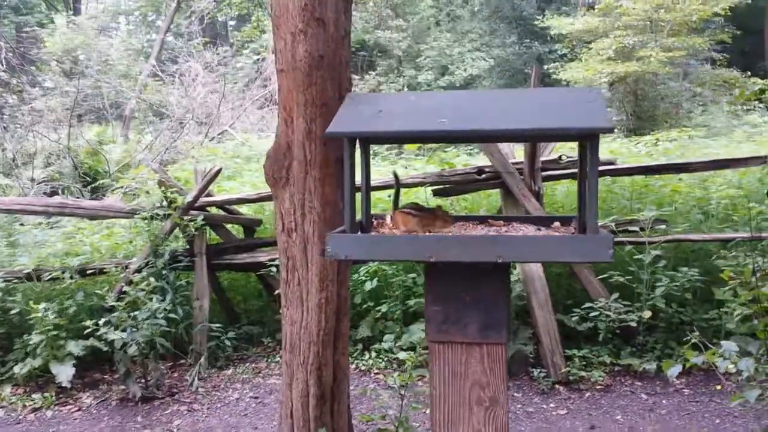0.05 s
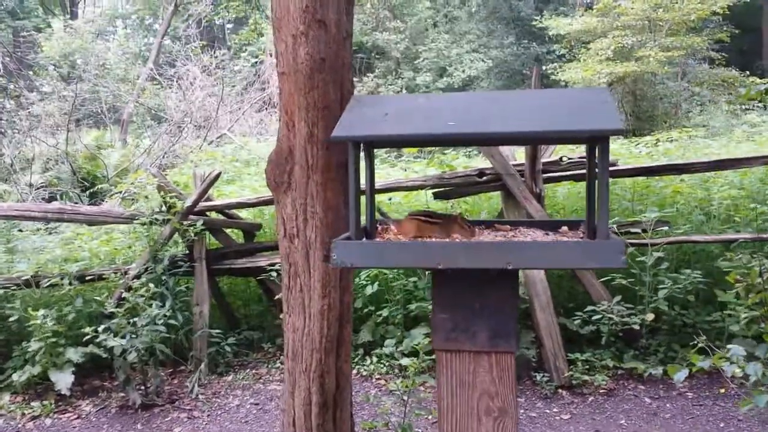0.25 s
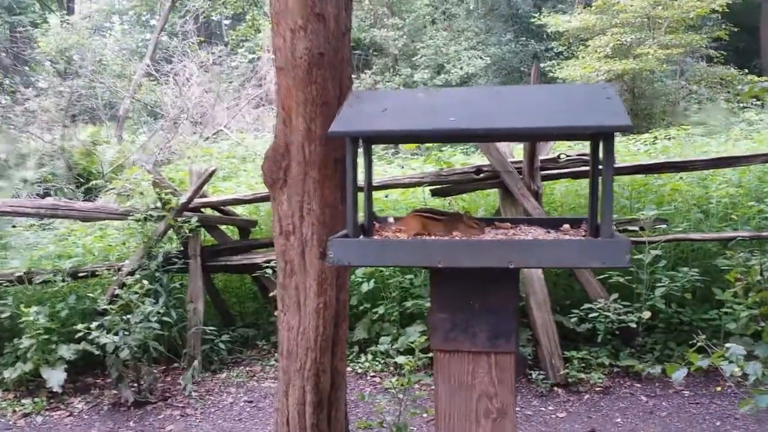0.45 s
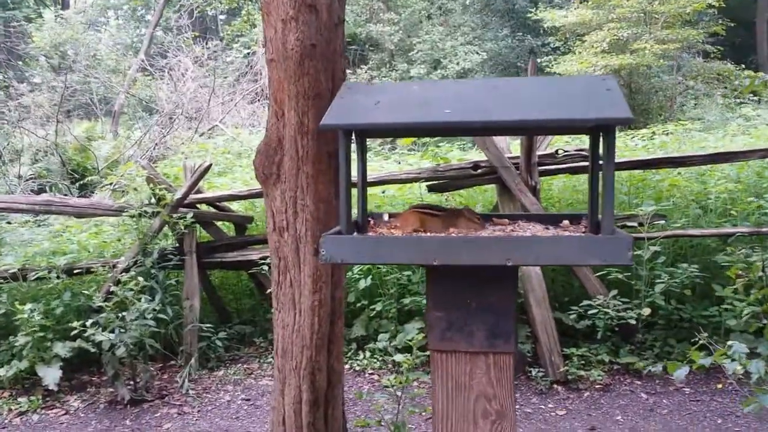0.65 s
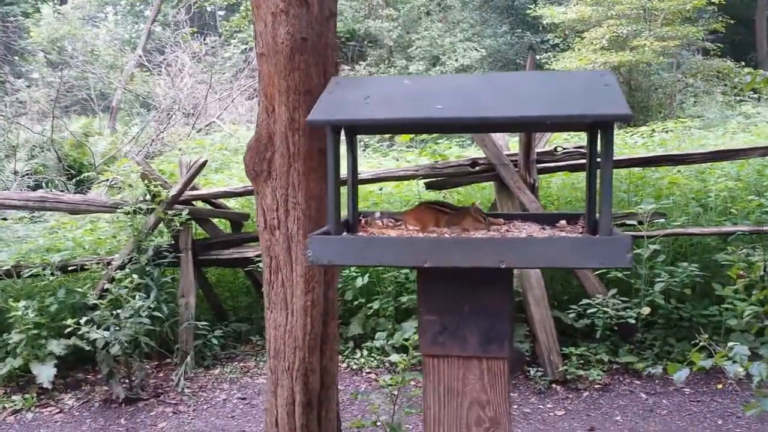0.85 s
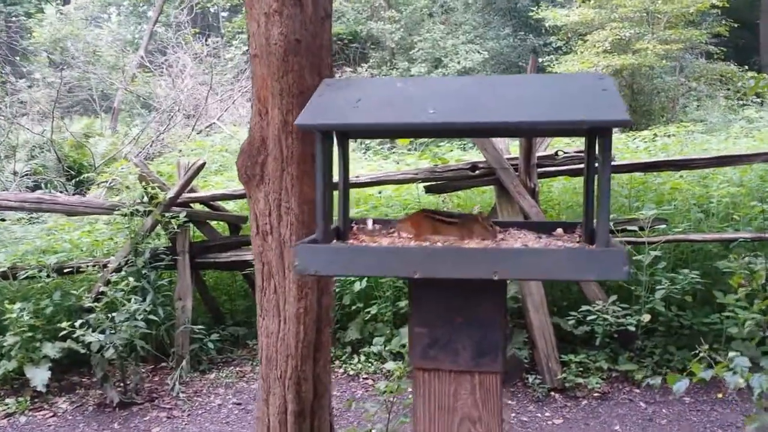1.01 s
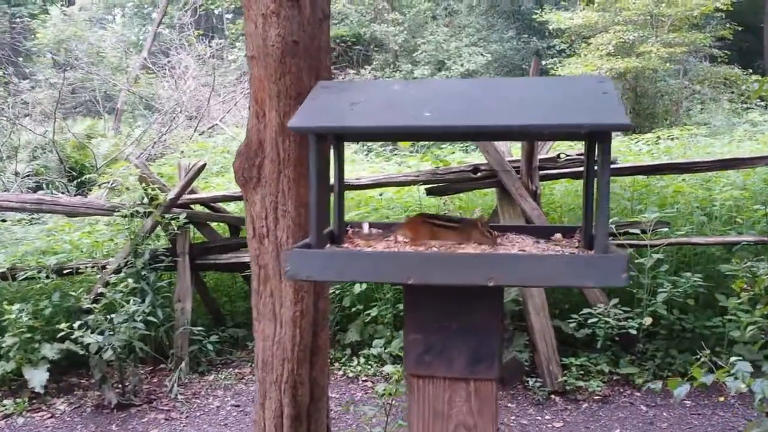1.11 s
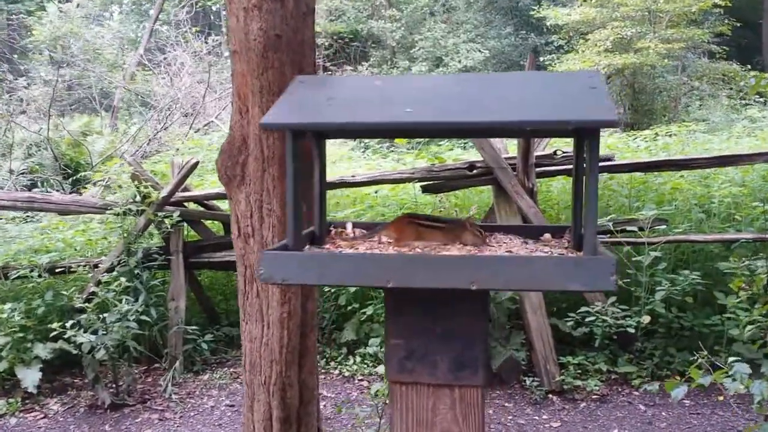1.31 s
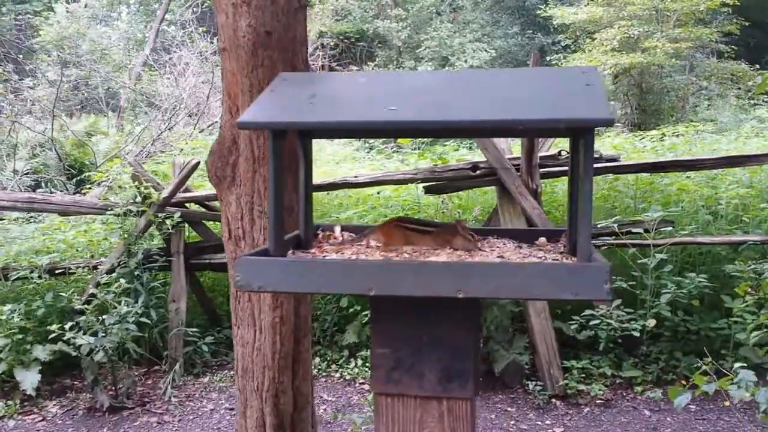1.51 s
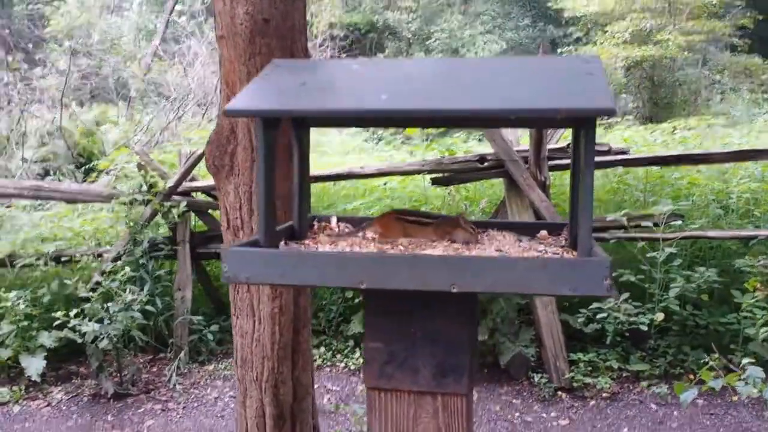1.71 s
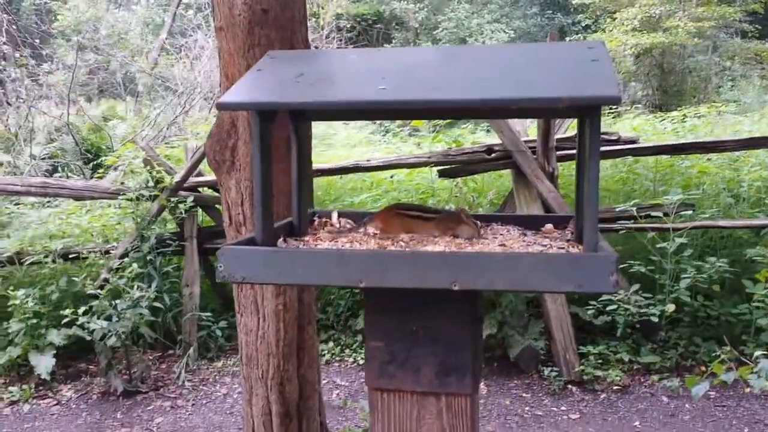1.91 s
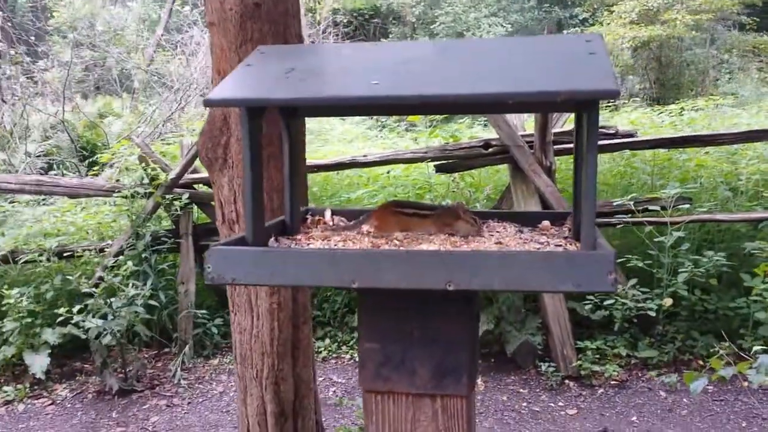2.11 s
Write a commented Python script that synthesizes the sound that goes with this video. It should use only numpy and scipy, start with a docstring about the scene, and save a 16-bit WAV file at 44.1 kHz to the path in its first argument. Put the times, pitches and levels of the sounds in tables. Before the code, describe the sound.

One short, high chipmunk chirp echoes briefly against quiet open air.

```python
"""Open air hisses over a low distant rumble and a faint machine hum, in a yard at the edge of a wood.
Far birds warble through the trees, and seeds tick and rustle faintly in a feeder.
Off to the right a chipmunk gives one sharp chip, a whistle that sweeps up in 20 ms;
nearby surfaces and then the trees throw it back. Later a light tap rings the feeder's wooden tray."""
import sys
import numpy as np
from scipy import signal
from scipy.fft import rfft, irfft, next_fast_len
from scipy.io import wavfile
from scipy.ndimage import uniform_filter1d

SR = 44100
rng = np.random.default_rng(int(sys.argv[2]) if len(sys.argv) > 2 else 0)


def store_pcm(level_fs):
    """Save levels as 16-bit WAV."""
    pcm = np.round(np.clip(level_fs, -1, 1) * 32767).astype(np.int16)
    wavfile.write(sys.argv[1], SR, np.atleast_2d(pcm).T)


N = 94815
NEAR_T60_S = .4  # reverb time of the yard

def amp(db):
    """Decibels to gain."""
    return 10 ** (np.asarray(db) / 20)

def unit(x):
    """Scales to rms 1."""
    return x / np.sqrt(np.mean(x ** 2) + 1e-20)

def curves_at(table, hz):
    """A table's curves at the given frequencies, interpolated on a log axis."""
    f, *columns = np.transpose(table)
    return np.array([np.interp(np.log(hz + 1), np.log(f + 1), c) for c in columns])

def pan(db):
    """Stereo gains for a level difference; positive leans left."""
    return amp(np.array([[.5], [-.5]]) * db)

def add(mix, start_s, sound):
    """Mixes a sound in at a cue time, trimming any overhang."""
    at = round(start_s * SR)
    sound = sound[..., max(-at, 0):]
    part = mix[..., max(at, 0):][..., :sound.shape[-1]]
    part += sound[..., :part.shape[-1]]

def eq(x, gain):
    """Filters by a gain that is a function of frequency."""
    size = next_fast_len(2 * x.shape[-1])
    spectrum = rfft(x, size) * gain(np.fft.rfftfreq(size, 1 / SR))
    return irfft(spectrum, size)[..., :x.shape[-1]]

def wander(count, hz):
    """Smooth random modulation up to about the given rate."""
    return unit(eq(rng.standard_normal(count), lambda f: np.exp(-(f / hz) ** 2)))

def scatter(x, t60, build_s=.0037, taps_per_s=3000):
    """Reverb: many small reflections off trunks and leaves, different left and right."""
    t = np.arange(SR) / SR
    taps = rng.standard_normal((2, SR)) * (rng.random((2, SR)) < taps_per_s / SR)
    taps *= (1 - np.exp(-t / build_s)) * np.exp(-np.log(1000) * t / t60)
    taps /= np.linalg.norm(taps, axis=1, keepdims=True)
    return signal.fftconvolve(x[None], taps, axes=1)[:, :N]

# Tone of the air bed: f/Hz, relative level/dB
AIR_SPECTRUM = [(15, -49), (25, -14), (37, -9), (100, 0.5), (170, -11.5), (247, -17), (358, -20.5),
                (520, -26), (716, -18.5), (840, -16), (985, -19), (1550, -26), (1920, -25.5), (2080, -28),
                (3930, -33), (5270, -29.5), (14500, -39)]
# Its stereo image: f/Hz, coherence, left minus right/dB
AIR_IMAGE = [(60, .98, 2), (133, 1, 1.5), (290, 0.76, 2), (700, 1, 2.5), (1280, 0, 5), (4300, 0.43, 3.5),
             (8400, 0, -2.5), (13500, 0, 1)]
# Its fader rides: t/s, rumble gain/dB, hiss gain/dB
AIR_RIDES = [(0, -1, 6), (.07, 8, 5.5), (.14, -2.5, 3), (.22, 6, 5.5), (.31, 1.5, 5.5), (.52, 3, 3.5),
             (.62, 0, 2.5), (.78, -1.5, 2.5), (.88, 2, 2), (1.02, 0, 1), (1.13, 2, 2.5), (1.28, -5, -1),
             (1.52, -1, -0.5), (1.63, 0, 1.5), (1.82, 2, 3.5), (1.92, -0.5, 2.5), (2.15, 2, 2)]

def air(bed_db=-53.5, flicker_db=1.16, lag_s=.000323, crossover_hz=470):
    """Distant rumble and leaf hiss, each drifting slowly in level."""
    frames, hz = N // 512 + 5, np.fft.rfftfreq(2048, 1 / SR)
    re, im, side_re, side_im, flicker = rng.standard_normal((frames, len(hz), 5)).T
    coherence, balance_db = curves_at(AIR_IMAGE, hz)
    coherence = coherence[:, None]
    left = re + 1j * im
    right = coherence * left + np.sqrt(1 - coherence ** 2) * (side_re + 1j * side_im)
    right *= np.exp(2j * np.pi * hz * lag_s)[:, None]  # the right side leads
    flicker = uniform_filter1d(flicker, size=20, axis=0)  # smooth across frequency
    flicker = unit(uniform_filter1d(flicker, size=8, axis=1))  # and over time
    tone = amp(curves_at(AIR_SPECTRUM, hz).T + flicker_db * flicker)
    spectra = np.array([left, right]) * tone * pan(balance_db)[:, :, None]
    bed = amp(bed_db) * unit(signal.istft(spectra, nperseg=2048, noverlap=1536)[1][:, :N])
    rumble = eq(bed, lambda f: 1 / (1 + (f / crossover_hz) ** 4))
    hiss = bed - rumble
    cues, rumble_db, hiss_db = np.transpose(AIR_RIDES)
    t = np.arange(N) / SR
    return rumble * amp(np.interp(t, cues, rumble_db)) + hiss * amp(np.interp(t, cues, hiss_db))

# Drone tones: f/Hz, level/dB
HUM_TONES = [(91.5, -63.5), (355, -78)]

def machine_hum(waver=.0202):
    """Far machinery drones on faint tones that waver in pitch."""
    drone = np.zeros(N)
    for hz, db in HUM_TONES:
        pitch = hz * (1 + waver * wander(N, hz=9))
        drone += amp(db) * unit(np.sin(2 * np.pi * np.cumsum(pitch) / SR))
    return pan(db=3.4) * drone

# Bird cues: t/s, length/s, f/Hz, reverb send/dB
BIRD_NOTES = [(-.04, .085, 3420, -54), (.04, .04, 3380, -56), (.115, .04, 3270, -59), (.18, .07, 3370, -60),
              (1.015, .03, 4300, -62), (1.99, .05, 5200, -63), (2.08, .06, 5420, -65)]

def far_birds(warble=.04, warble_hz=90, jitter_hz=100):
    """Warbled notes, fully wet: they arrive only through the trees."""
    song = np.zeros(N)
    for start, length, hz, db in BIRD_NOTES:
        t = np.arange(0, length, 1 / SR)
        pitch = hz * (1 + warble * np.sin(2 * np.pi * warble_hz * t))
        pitch += jitter_hz * wander(len(t), hz=400)
        swell = np.sin(np.pi * t / length) ** .5
        add(song, start, amp(db) * swell * np.sin(2 * np.pi * np.cumsum(pitch) / SR))
    return scatter(song, t60=.22)

# Seed cues: t/s, level/dB, centre f/Hz, decay/s
SEED_CRUNCHES = [(.076, -57, 3000, .004), (.278, -54, 4800, .007), (.329, -55, 2800, .004),
                 (.448, -59, 5000, .006), (.685, -62, 2900, .014), (.774, -61, 4800, .008),
                 (.785, -53, 5000, .004), (.819, -58, 5000, .008), (1.607, -58, 1750, .01),
                 (1.648, -63, 1850, .016), (1.724, -64, 3500, .03), (1.73, -63, 6000, .06),
                 (1.785, -63, 5200, .06), (1.96, -66, 1950, .04)]

def seed_crunches(grit=.35, half_width_octaves=.45, rise_s=.004):
    """Seeds crunch and shift in short bursts of grainy band-passed noise."""
    t = np.arange(SR // 4) / SR
    seeds = np.zeros(N)
    for start, db, hz, decay in SEED_CRUNCHES:
        grains = rng.standard_normal(len(t)) * np.exp(grit * wander(len(t), hz=470))
        husk = unit(eq(grains, lambda f: 1 / (1 + (np.log2((f + 1) / hz) / half_width_octaves) ** 2)))
        envelope = np.minimum(t / rise_s, np.exp((rise_s - t) / decay))
        add(seeds, start, amp(db) * husk * envelope)
    return seeds

# Loudness of the whistle along its sweep: f/Hz, gain/dB
WHISTLE_CONTOUR = [(5330, -11), (5850, -3.5), (6120, -7), (6500, -1.5), (6900, .5), (7200, -2), (7450, .5)]
# Its octave, strongest early on: whistle f/Hz, level against the whistle/dB
WHISTLE_OCTAVE = [(5400, -16), (5950, -16.5), (6250, -24), (6600, -30), (7300, -48)]
START_HZ, TOP_HZ = 5330, 7660

def chip(start_s=.2051, length_s=.02, glide_s=.0079, fade_s=.002, gain_db=-16, rasp=.01):
    """The chipmunk's dry call: one rising whistle with a weak octave."""
    t = np.arange(0, length_s, 1 / SR)
    hz = TOP_HZ + (START_HZ - TOP_HZ) * np.exp(-t / glide_s)
    phase = 2 * np.pi * np.cumsum(hz) / SR
    gate = np.sin(np.pi / 2 * np.clip(np.minimum(t, length_s - t) / fade_s, 0, 1)) ** 2
    tone = np.sin(phase) + amp(curves_at(WHISTLE_OCTAVE, hz)[0]) * np.sin(2 * phase)
    level = amp(gain_db + curves_at(WHISTLE_CONTOUR, hz)[0])
    roughness = 1 + rasp * wander(len(t), hz=794)
    call = np.zeros(N)
    add(call, start_s, gate * level * tone * roughness)
    return call

# EQ of the direct path: f/Hz, left/dB, right/dB
DIRECT_EQ = [(5700, .5, -3), (6300, -6, -1), (6900, -15, 2), (7500, -15, .5), (12000, -9, 1)]
# Slaps off the feeder, posts and trunks: delay/s, left/dB, right/dB
SLAPS = [(.0036, -19, -15), (.0068, -16, -24), (.0185, -17, -13), (.028, -22, -14), (.063, -24, -17)]
# EQ of the reverb tail: f/Hz, left/dB, right/dB
TAIL_EQ = [(5200, 0, -2), (5700, 1.5, -3), (6530, -1, -2.5), (7300, -5.5, 3), (7900, -8, -1),
           (12000, 0, 6.5)]

def yard_echoes(call, left_late_s=.00011, near_db=-5.5, wood_db=-8.5, dull_db_per_octave=16.5):
    """The call arrives straight, then off near surfaces, then out of the wood."""
    lags = np.array([[left_late_s], [0]])
    early = eq(call, lambda f: amp(curves_at(DIRECT_EQ, f)) * np.exp(-2j * np.pi * f * lags))
    for delay, left_db, right_db in SLAPS:
        add(early, delay, amp([[left_db], [right_db]]) * call)
    # Leaves and air tilt the longest paths away from the treble.
    dulled = eq(call, lambda f: amp(-dull_db_per_octave * np.log2(np.maximum(f, START_HZ) / TOP_HZ)))
    tail = amp(near_db) * scatter(call, NEAR_T60_S) + amp(wood_db) * scatter(dulled, t60=.68)
    return early + eq(tail, lambda f: amp(curves_at(TAIL_EQ, f)))

# Tap cue: t/s, level/dB
TRAY_TAPS = [(1.1658, -42)]
# Resonances of the tray: f/Hz, relative level/dB, t60/s
TRAY_MODES = [(1600, -7, .012), (1950, 0, .012), (2200, -5, .012)]

def tray_tap(attack_s=.00064):
    """A light tap briefly rings the feeder's wooden tray."""
    t = np.arange(SR // 4) / SR
    ring = sum(amp(db) * np.exp(-np.log(1000) * t / t60) * np.sin(2 * np.pi * hz * t)
               for hz, db, t60 in TRAY_MODES)
    tap = np.zeros(N)
    for start, db in TRAY_TAPS:
        add(tap, start, amp(db) * ring * (1 - np.exp(-t / attack_s)))
    return tap

def scene(feeder_wet_db=-6):
    """The mix: chipmunk right, feeder left, birds and background all around."""
    chipmunk = yard_echoes(chip())
    seeds, tap = seed_crunches(), tray_tap()
    feeder = pan(db=4) * seeds + pan(db=7) * tap
    feeder += amp(feeder_wet_db) * scatter(seeds + tap, NEAR_T60_S)
    return chipmunk + feeder + far_birds() + air() + machine_hum()

def record(dry, low_cut_hz=28, high_cut_hz=14550):
    """Master EQ: a gentle low cut and a steep high cut."""
    dry = signal.sosfilt(signal.butter(2, low_cut_hz, "high", fs=SR, output="sos"), dry)
    high_cut = signal.firwin(511, high_cut_hz, window=("kaiser", 9), fs=SR)
    return signal.oaconvolve(dry, high_cut[None], "same")

dry = scene()
out = record(dry)
store_pcm(out)
```